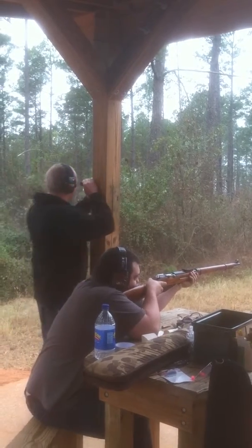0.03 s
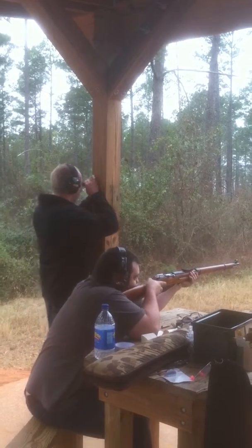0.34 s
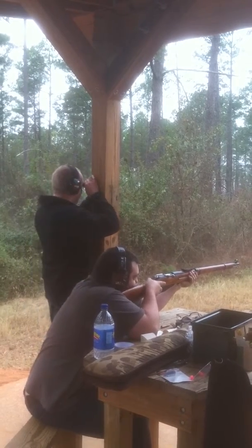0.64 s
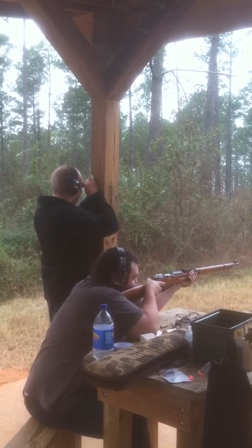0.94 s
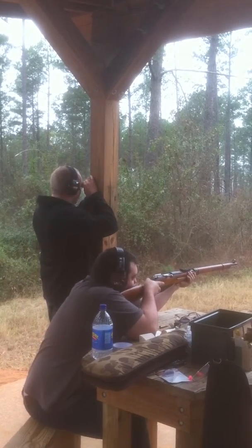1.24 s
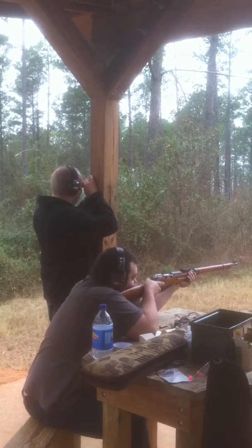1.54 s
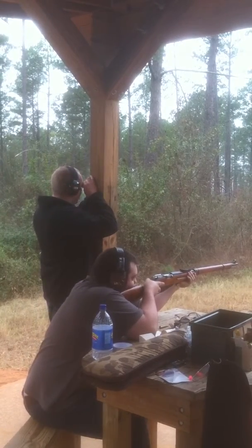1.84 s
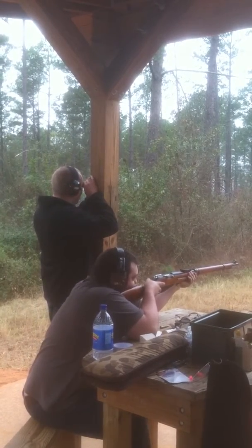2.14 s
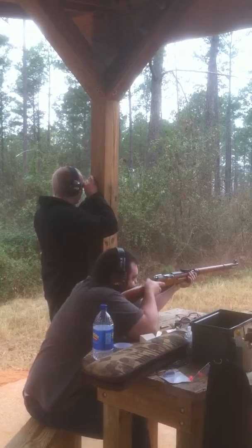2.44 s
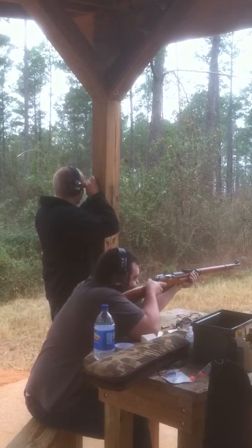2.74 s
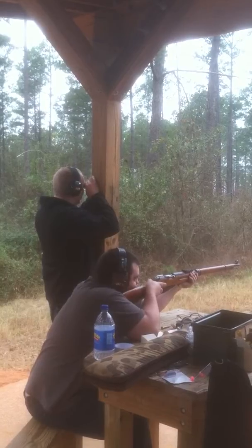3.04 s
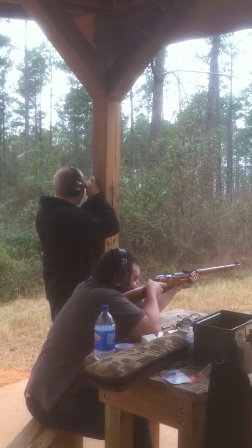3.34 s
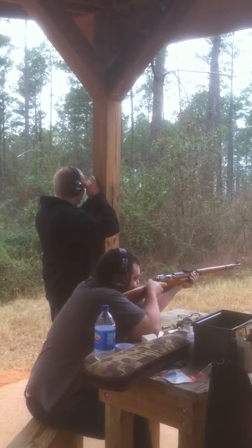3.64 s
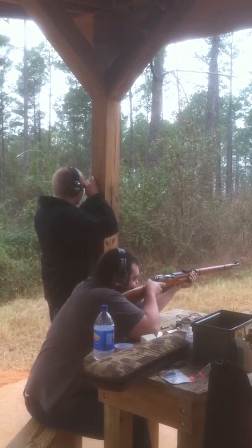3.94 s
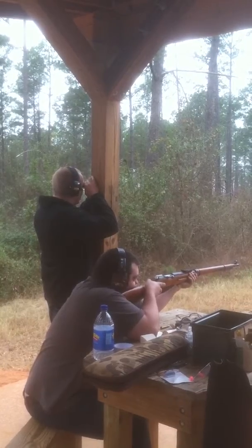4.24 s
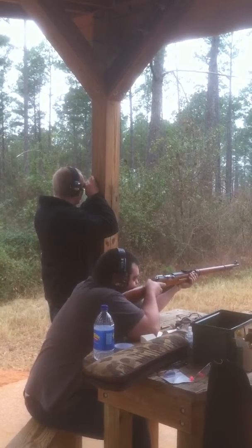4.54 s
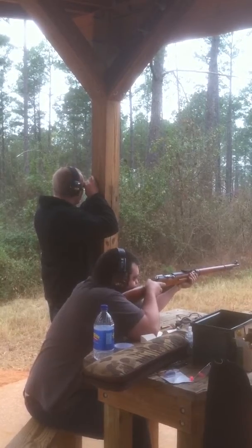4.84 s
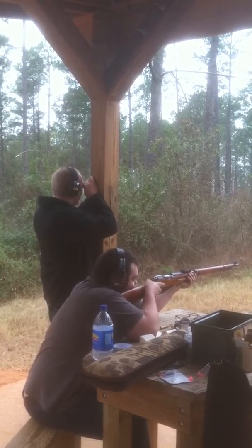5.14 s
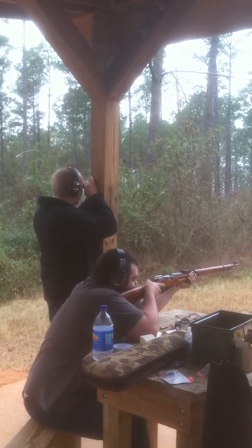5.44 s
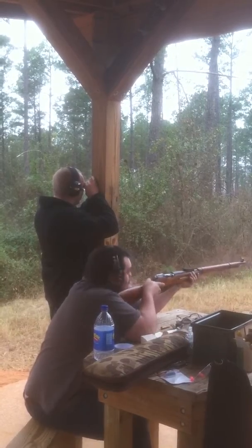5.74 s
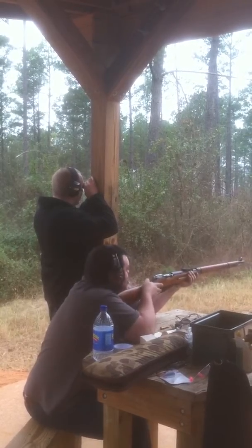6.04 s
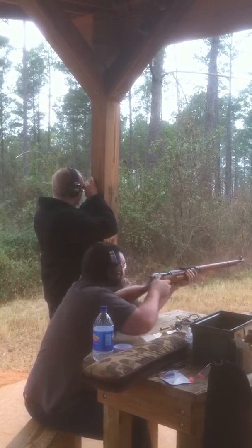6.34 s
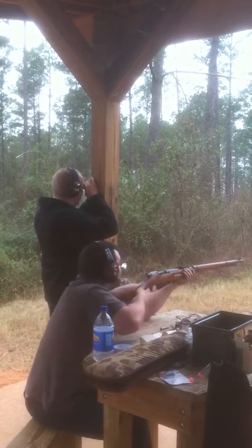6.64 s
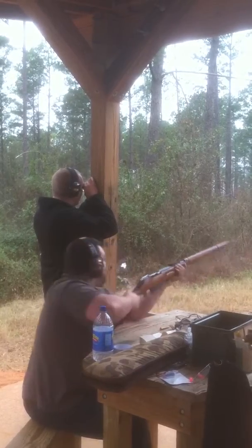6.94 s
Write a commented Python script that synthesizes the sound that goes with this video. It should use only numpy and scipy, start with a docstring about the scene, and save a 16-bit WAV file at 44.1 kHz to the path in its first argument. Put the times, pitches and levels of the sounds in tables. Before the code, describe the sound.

Sharp rifle cracks come one to two seconds apart, heard from under a wooden shelter at a forest range. Early on, one dull shot sounds from far down the line. Near the end, a heavy rifle booms close by with a long rolling echo, followed by one more lighter crack. The close shots distort the microphone slightly and fade into the woods over a barely audible breeze.

```python
"""A heavy rifle fires once at the next bench, heard from under the timber roof of a forest range. A lighter
neighbour fires six times, alike at every shot, the first already dying away at the start; a third rifle thumps
once far down the line. Each blast bounces off bench, ground and roof, rings in the shelter and rolls away
through the pines. One microphone, overloaded by the close blasts; a light breeze fills the gaps."""
import sys
import numpy as np
from scipy import signal
from scipy.fft import rfft, irfft, next_fast_len
from scipy.io import wavfile
from scipy.ndimage import uniform_filter1d

SR = 44100
rng = np.random.default_rng(int(sys.argv[2]) if len(sys.argv) > 2 else 0)


def pcm_store(signal):
    """Save signal as 16-bit PCM."""
    levels = np.round(np.clip(np.atleast_2d(signal), -1, 1) * 32767)
    wavfile.write(sys.argv[1], SR, levels.astype(np.int16).T)


N = 309050
TOP_HZ = 15700  # upper band limit


def near_rifle(start_s=5.5938):
    """The heavy bolt-action rifle at the next bench: deep and loud, with a long roll."""
    # colour under the roof and back from the trees: pitch_hz, level_db
    blast = [(40, -18), (90, -25), (150, -4), (210, 1), (400, -3), (750, -1), (1200, -5), (1600, -13),
             (2800, -14), (4000, -27), (6000, -31), (10000, -57), (15500, -72)]
    echo = [(40, -34), (90, -24), (150, -1), (300, 2), (480, -3), (680, 0), (1200, -10), (1550, -15),
            (2800, -17), (4000, -31), (7300, -37), (10000, -60), (15500, -79)]
    # reflection trains: first_s, gap_s, widening, first_db, step_db, scatter_s, blurring, count
    short_paths = [dict(first_s=.003, gap_s=.0075, widening=1, first_db=15.5, step_db=0, scatter_s=.007, blurring=1.45, count=4)]  # bench, ground, roof
    long_paths = [dict(first_s=.135, gap_s=.115, widening=1.35, first_db=-4, step_db=-2, scatter_s=.06, blurring=1.5, count=3)]  # earth banks, tree line
    crack = under_roof(blast, short_paths, direct_db=15, shelter_db=19.2, ring_db=18.8)
    roll = from_woods(echo, long_paths, forest_db=5.9, rise_s=.035, clump_db=1.7)
    return delayed(crack + roll, start_s)


def neighbour_rifle():
    """A light, sharp rifle on a rest nearby: every shot takes the same paths."""
    # equally loud shots, the first already dying away at the start: start_s
    shots = [-1.2, .3906, 1.6779, 2.9387, 5.0526, 6.4191]
    # colour under the roof and back from the trees: pitch_hz, level_db
    blast = [(40, -4), (120, -25), (200, -2), (330, -2), (600, -3), (880, 0), (1250, -9), (1550, -17),
             (2000, -11), (3000, -12), (3600, -30), (7200, -33), (10000, -58), (15500, -66)]
    echo = [(40, -26), (90, -32), (160, -16), (280, -7), (500, -6), (800, 1), (1200, -7), (1550, -16),
            (2900, -18), (3800, -30), (6800, -39), (10000, -61), (15500, -77)]
    # reflection trains: first_s, gap_s, widening, first_db, step_db, scatter_s, blurring, count
    short_paths = [dict(first_s=.001, gap_s=.0022, widening=1.82, first_db=7.5, step_db=-1.7, scatter_s=.003, blurring=1.18, count=5)]
    long_paths = [dict(first_s=.097, gap_s=.0677, widening=1, first_db=-15, step_db=-1.6, scatter_s=.08, blurring=.7, count=5)]
    crack = under_roof(blast, short_paths, direct_db=10, shelter_db=9.6, ring_db=7.9)
    roll = from_woods(echo, long_paths, forest_db=-5.4, rise_s=.025, clump_db=1.5)
    return sum(delayed(crack + roll, start_s) for start_s in shots)


def far_rifle(start_s=2.1707):
    """A shot from far down the line: a dull thump, then brighter reflections."""
    # colour under the roof and back from the trees: pitch_hz, level_db
    blast = [(40, -10), (90, -7), (150, 5), (250, 5), (600, -4), (1200, -4), (1600, -15), (2800, -14),
             (3800, -27), (6800, -34), (10000, -50), (15500, -62)]
    echo = [(40, -18), (100, -18), (180, 0), (500, -3), (1200, 1), (1600, -3), (2800, -3), (3800, -17),
            (7000, -24), (10000, -39), (15500, -54)]
    # reflection trains: first_s, gap_s, widening, first_db, step_db, scatter_s, blurring, count
    short_paths = [dict(first_s=.001, gap_s=.005, widening=1, first_db=-10, step_db=4.5, scatter_s=.015, blurring=2, count=2)]
    long_paths = [dict(first_s=.003, gap_s=.025, widening=1.6, first_db=-11, step_db=-1.6, scatter_s=.45, blurring=.36, count=3),
                  dict(first_s=.46, gap_s=.085, widening=1.4, first_db=-20, step_db=-2, scatter_s=.22, blurring=1, count=3)]
    crack = under_roof(blast, short_paths, direct_db=-14, shelter_db=-6, ring_db=-17)
    roll = from_woods(echo, long_paths, forest_db=-14, rise_s=.015, clump_db=2)
    return delayed(crack + roll, start_s)


def under_roof(colour, paths, direct_db, shelter_db, ring_db):
    """The crack at the microphone: shock front, first bounces, then the shelter's short reverberation."""
    # decay under the roof: pitch_hz, t60_s
    shelter_decay = [(60, .13), (200, .21), (900, .24), (2800, .25), (7000, .25), (14000, .22)]
    shock = amp(direct_db) * signal.unit_impulse(SR)
    reverb = amp(shelter_db) * evened(dying_noise(shelter_decay, size=SR), width_hz=70)
    crack = coloured(shock + bounces(paths) + reverb, colour)
    return delayed(crack + amp(ring_db) * shelter_ring(), 0)


def shelter_ring(build_s=.007):
    """Standing waves between floor, benches and roof build up within a few crossings."""
    # standing waves: pitch_hz, level_db, t60_s
    modes = [(205, -1, .17), (268, -4, .18), (329, 3, .24), (408, -1, .22), (516, -7, .22), (580, -7, .22),
             (637, -6, .25), (757, -3, .22), (820, 0, .2), (908, 0, .22), (1008, -6, .22), (1175, -6, .25),
             (1579, -13, .22), (2738, -11, .22)]
    t = np.arange(SR) / SR
    ring = sum(amp(db - 60 * t / t60_s) * np.sin(2 * np.pi * (hz * t + rng.random()))
               for hz, db, t60_s in modes)
    return norm(ring * (1 - np.exp(-t / build_s)))


def from_woods(colour, paths, forest_db, rise_s, clump_db):
    """The roll of a shot: a few distinct echoes within the forest's long answer."""
    roll = amp(forest_db) * forest(rise_s, clump_db)
    echoes = delayed(bounces(paths), 0, size=len(roll))
    return delayed(coloured(roll + echoes, colour), 0)


def forest(rise_s, clump_db, size=3 * SR):
    """Echoes off trunks swell as the blast reaches the tree line, and come back in clumps."""
    # decay among the pines: pitch_hz, t60_s
    forest_decay = [(100, 2), (250, 3), (800, 3.5), (2500, 2.9), (4500, 1.8), (7500, 1.2), (14000, .8)]
    t = np.arange(size) / SR
    clumps = amp(clump_db * (wobble(110, size) + .5 * wobble(14, size)))
    swell = 1 - np.exp(-t / rise_s)
    return norm(dying_noise(forest_decay, size) * clumps * swell)


def bounces(paths):
    """All the reflections of these trains, summed at the microphone."""
    return sum(amp(db) * bounce(delay_s, scatter_s)
               for train in paths for delay_s, db, scatter_s in echo_train(**train))


def echo_train(first_s, gap_s, widening, first_db, step_db, scatter_s, blurring, count):
    """Surfaces answer in turn; each multiplies the gap by widening and the scatter time by blurring."""
    k = np.arange(count)
    gaps = gap_s * widening ** k
    delays = first_s + np.cumsum(gaps) - gaps
    return zip(delays, first_db + step_db * k, scatter_s * blurring ** k)


def bounce(delay_s, scatter_s, edge_at_1s_hz=1100, size=6144):
    """A rough surface returns a scattered copy of the blast; the longer its path, the duller."""
    decay = amp(-60 * np.arange(size) / SR / scatter_s)
    burst = evened(rng.standard_normal(size) * decay, width_hz=700)
    edge_hz = min(edge_at_1s_hz / abs(delay_s), TOP_HZ)
    air_loss = signal.butter(2, edge_hz, fs=SR, output="sos")
    return delayed(signal.sosfilt(air_loss, burst), delay_s, size=SR)


def dying_noise(decay, size):
    """Countless overlapping echoes; each pitch dies at its own speed."""
    hz, t, bands = signal.stft(rng.standard_normal(size), SR, nperseg=256)
    fade = amp(-60 * t / along(decay, hz)[:, None])
    return signal.istft(bands * fade, SR)[1][:size]


def breeze(level_db=-74):
    """A light breeze in the pines over faint hiss, heard between shots."""
    # colour of the quiet woods: pitch_hz, level_db
    colour = [(30, -6), (80, -12), (150, -4), (400, -3), (750, 0), (1300, -12), (2000, -19), (4500, -20),
              (9000, -27), (15500, -35)]
    return amp(level_db + .7 * wobble(2)) * coloured(rng.standard_normal(N), colour)


def amp(db):
    """Decibels to gain."""
    return 10 ** (np.asarray(db) / 20)


def norm(x):
    """x with an energy of 1."""
    return x / np.sqrt(np.sum(x ** 2) + 1e-20)


def along(points, hz):
    """(pitch_hz, value) points read on a log axis."""
    pitches, values = np.transpose(points)
    return np.interp(np.log(hz + 1), np.log(pitches + 1), values)


def delayed(x, start_s, size=N):
    """x moved to start_s, then cut or padded to size samples."""
    start = round(start_s * SR)
    lead = max(start, 0)
    x = x[max(-start, 0):][:size - lead]
    return np.pad(x, (lead, size - lead - len(x)))


def coloured(x, colour, size=4096):
    """x through a causal filter of unit energy with this spectrum."""
    gain = amp(along(colour, np.fft.rfftfreq(size, 1 / SR)))
    cepstrum = irfft(np.log(gain))
    # minimum phase: nothing sounds ahead of the attack
    cepstrum[1:size // 2] *= 2
    cepstrum[size // 2 + 1:] = 0
    response = norm(irfft(np.exp(rfft(cepstrum))))
    return signal.oaconvolve(x, response)[:len(x)]


def wobble(knots_per_s, size=N):
    """A random curve, straight between its knots."""
    knots = rng.standard_normal(size // 100)
    return np.interp(np.arange(size) * knots_per_s / SR, np.arange(len(knots)), knots)


def evened(x, width_hz):
    """x with equal energy in every band of this width; finer peaks and dips stay."""
    spectrum = rfft(x, 2 * len(x))
    width_bins = max(int(width_hz * 2 * len(x) / SR), 1)
    power = np.abs(uniform_filter1d(np.abs(spectrum) ** 2, width_bins))
    return norm(irfft(spectrum / np.sqrt(power + 1e-12))[:len(x)])


def overloaded(x, ceiling, hardness):
    """Peaks flatten as they near the ceiling."""
    return x / (1 + np.abs(x / ceiling) ** hardness) ** (1 / hardness)


def scene():
    """Three firing points and the woods, in mono from under the roof."""
    return (neighbour_rifle() + far_rifle() + near_rifle() + breeze())[None]


def record(dry, low_cut_hz=135):
    """The microphone overloads; the recorder cuts the bass, caps the peaks and ends at its band limit."""
    heard = overloaded(dry, ceiling=.66, hardness=4)
    low_cut = signal.butter(2, low_cut_hz, "highpass", fs=SR, output="sos")
    capped = overloaded(signal.sosfilt(low_cut, heard), ceiling=.74, hardness=8)
    size = next_fast_len(N + SR)
    hz = np.fft.rfftfreq(size, 1 / SR)
    band_limit = 1 / np.sqrt(1 + (hz / TOP_HZ) ** 120)
    return irfft(rfft(capped, size) * band_limit, size)[:, :N]


dry = scene()
out = record(dry)
pcm_store(out)
```